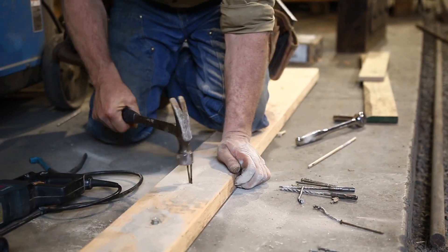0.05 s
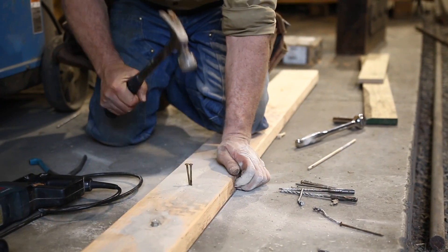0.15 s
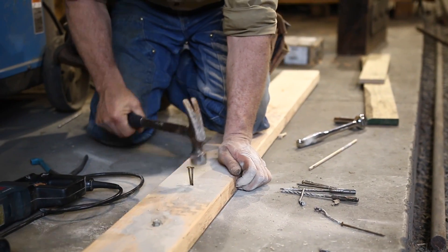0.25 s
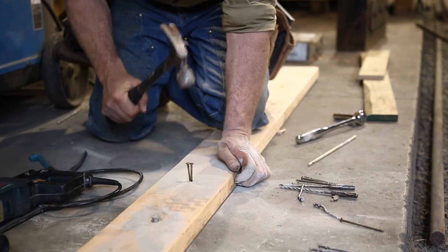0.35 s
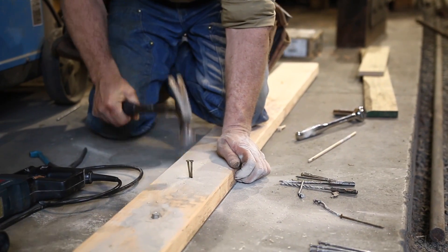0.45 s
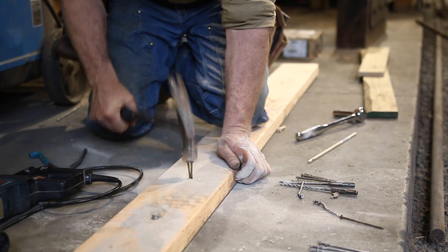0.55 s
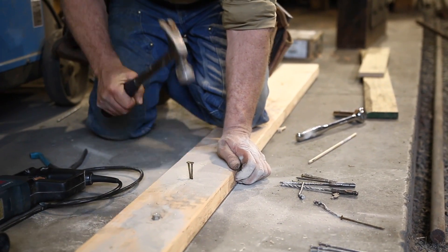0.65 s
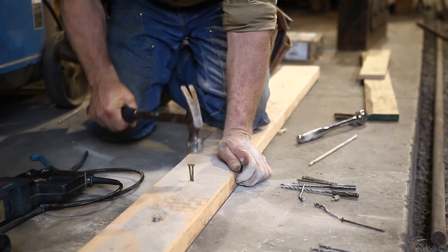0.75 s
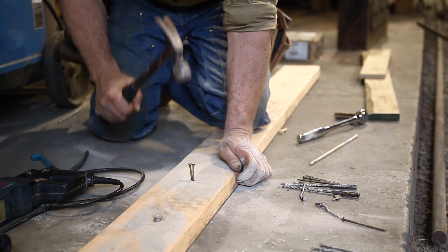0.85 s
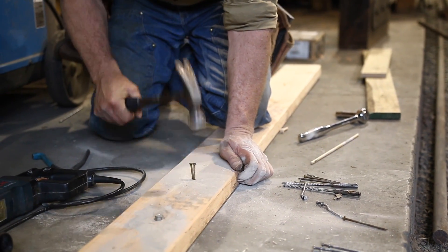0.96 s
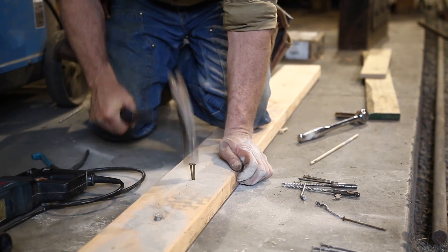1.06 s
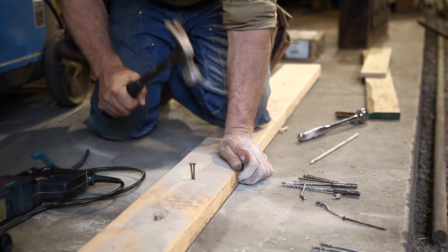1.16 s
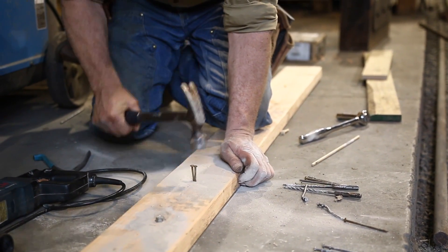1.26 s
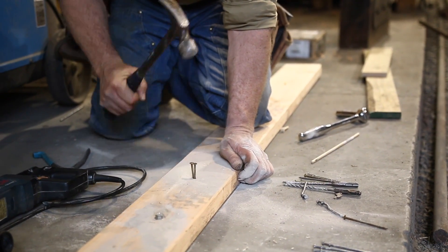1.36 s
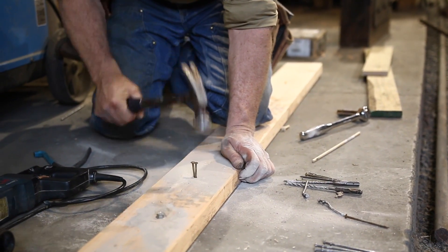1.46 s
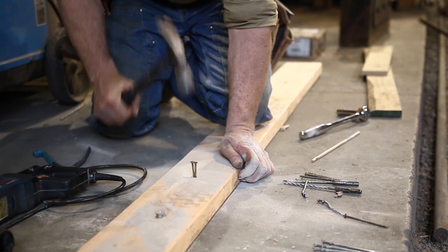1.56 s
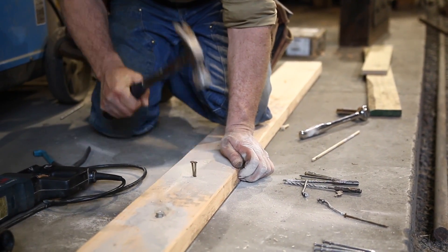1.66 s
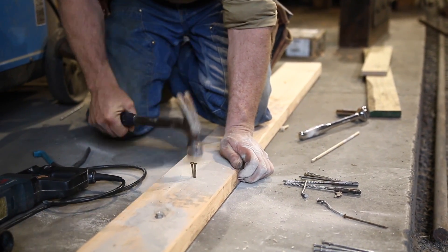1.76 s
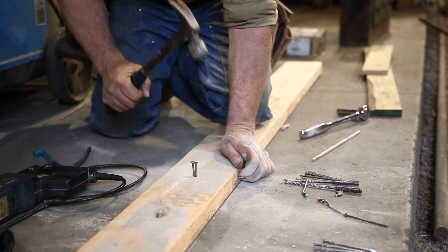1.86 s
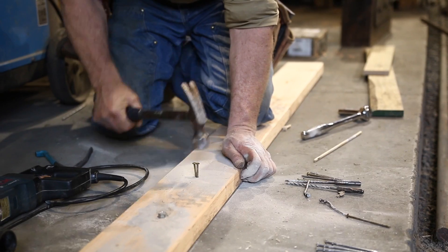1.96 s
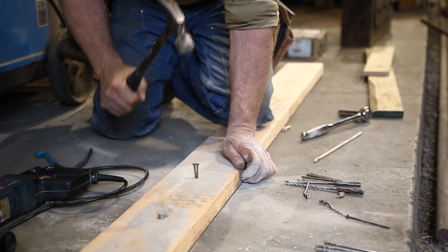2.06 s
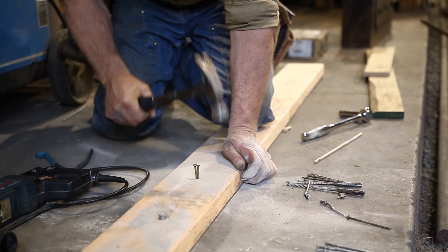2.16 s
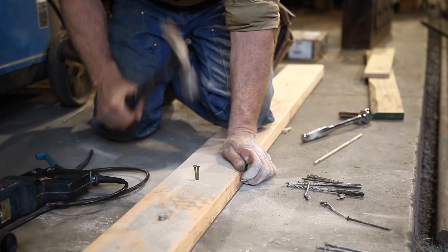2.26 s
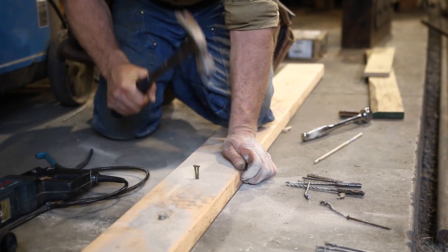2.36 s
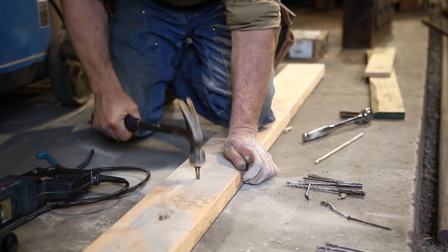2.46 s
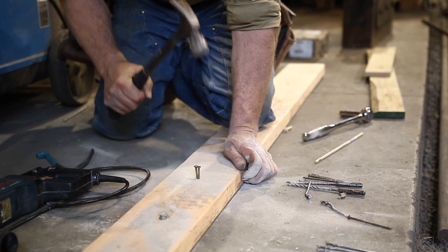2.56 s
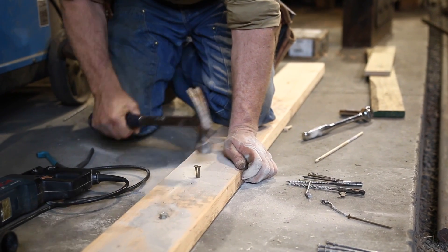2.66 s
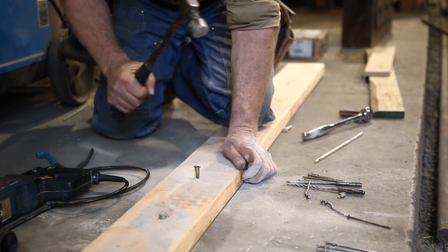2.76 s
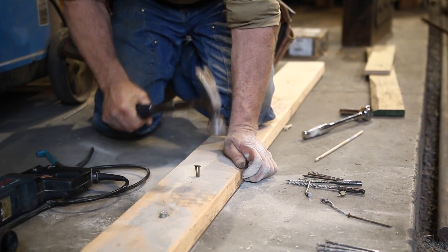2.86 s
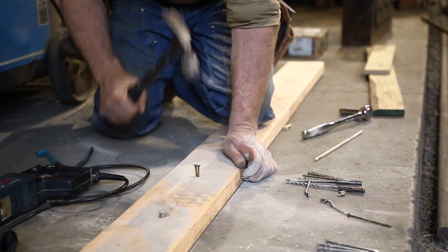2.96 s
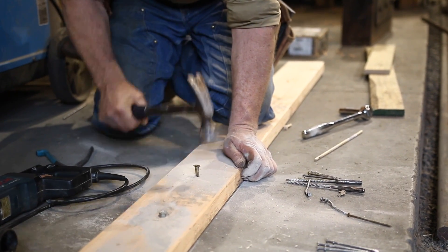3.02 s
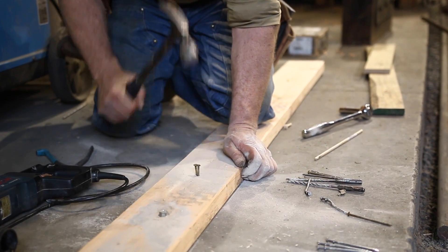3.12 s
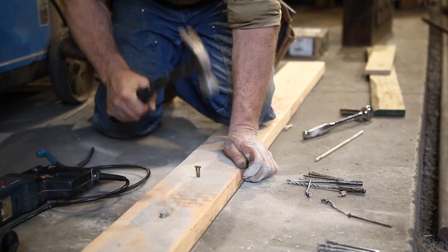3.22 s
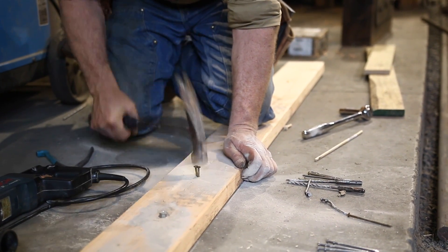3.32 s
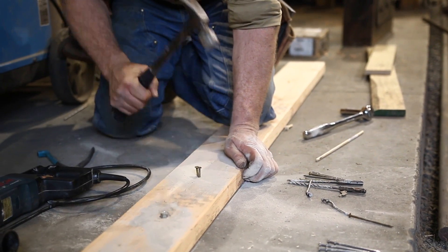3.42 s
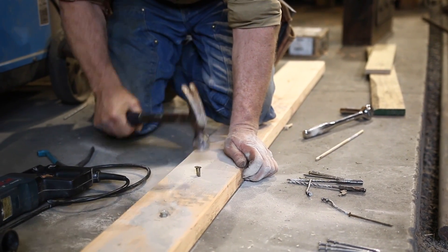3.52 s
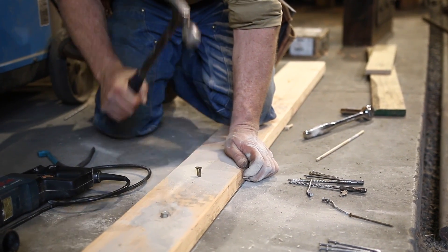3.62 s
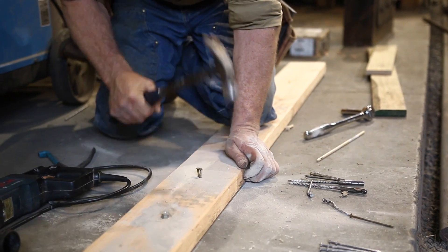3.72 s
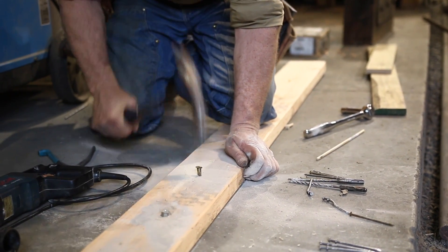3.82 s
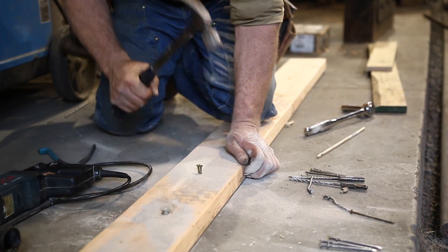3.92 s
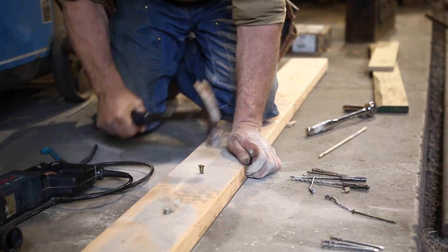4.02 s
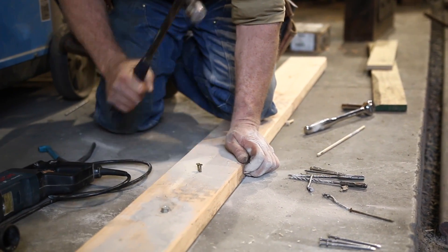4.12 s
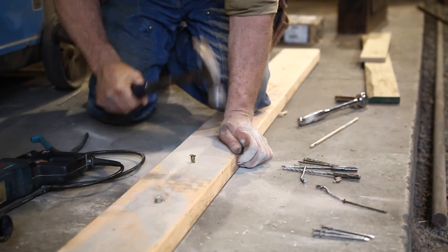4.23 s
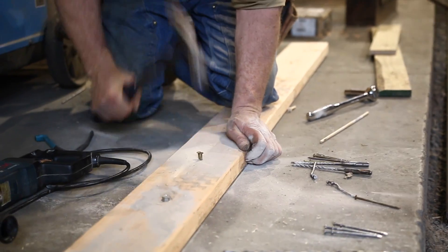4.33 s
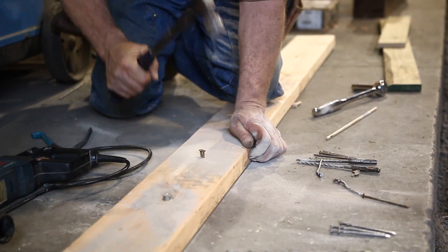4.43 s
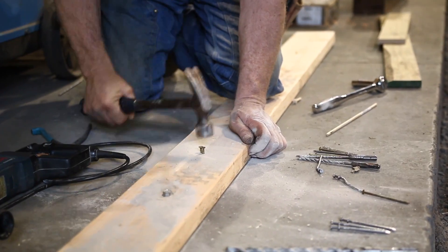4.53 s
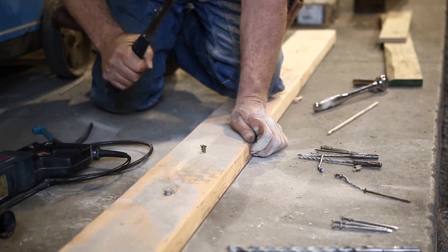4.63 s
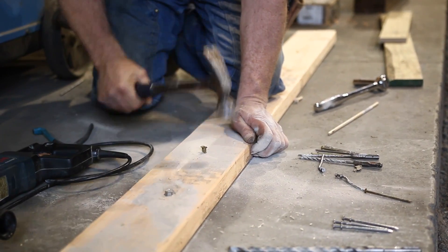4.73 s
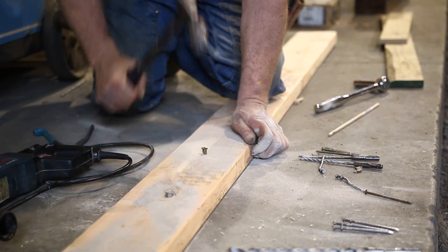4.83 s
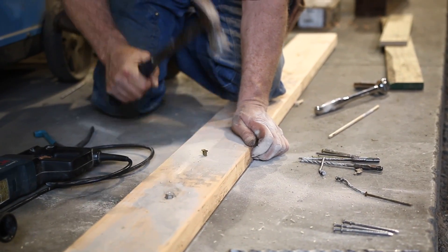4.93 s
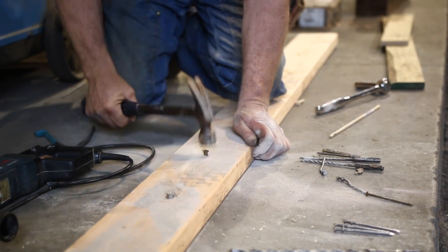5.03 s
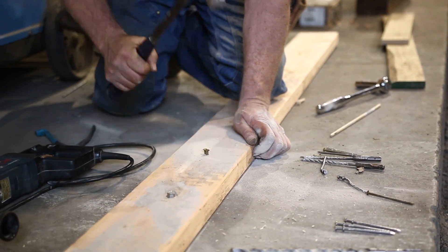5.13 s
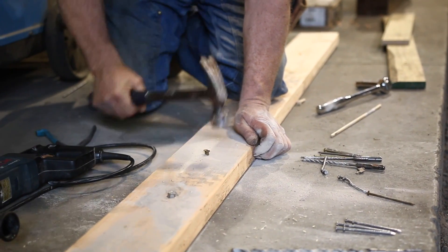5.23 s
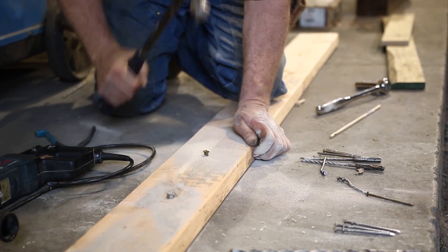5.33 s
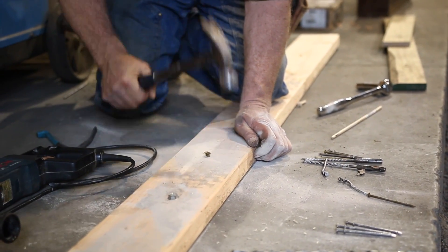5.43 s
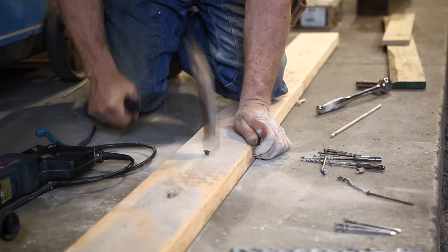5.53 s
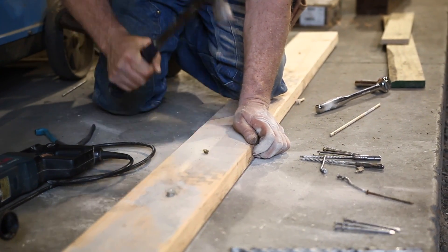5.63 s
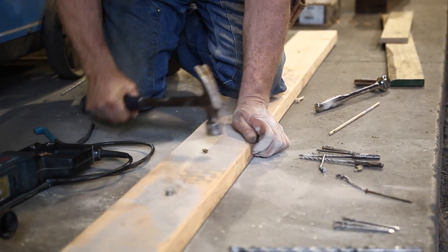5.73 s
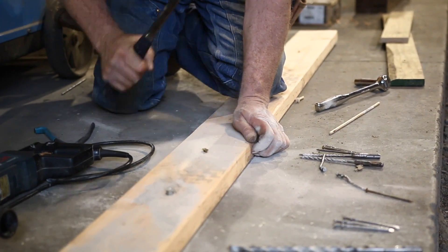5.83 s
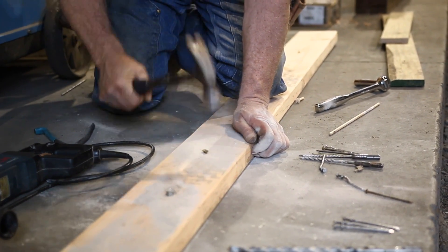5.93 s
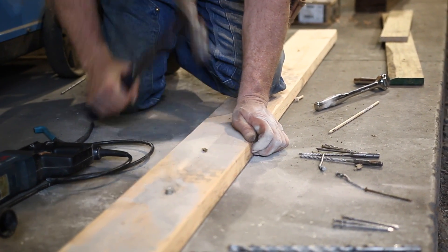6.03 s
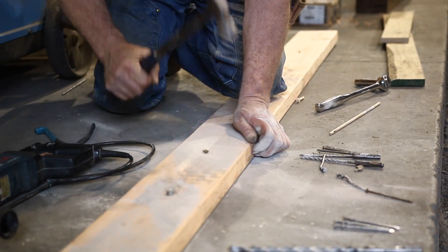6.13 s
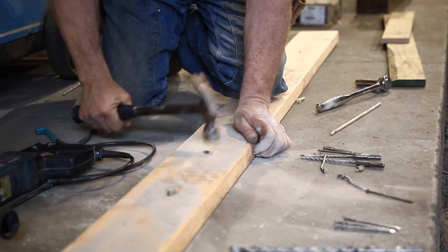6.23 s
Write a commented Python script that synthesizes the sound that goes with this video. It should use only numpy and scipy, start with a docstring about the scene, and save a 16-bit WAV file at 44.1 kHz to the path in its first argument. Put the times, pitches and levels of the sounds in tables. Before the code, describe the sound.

A hammer drives a nail into a plank on concrete with rapid, sharp, even blows, woody knock and steely clank, in a lively workshop.

```python
"""In a quiet workshop, a claw hammer drives a nail into a plank on a concrete floor, about six blows a second.
Each blow excites damped modes of plank and steel and cracks as the nail slips, a noise burst of stick and slip.
The nail's resonances wander and, on the whole, climb as it sinks; a few blows glance off the head.
The claw rings as a decaying sine, and a dense tail of decaying noise answers each blow.
Shaped noise under it all makes a faint rumble and hiss."""
import sys
import numpy as np
from scipy import signal
from scipy.fft import rfft, irfft
from scipy.io import wavfile

SR = 44100
rng = np.random.default_rng(int(sys.argv[2]) if len(sys.argv) > 2 else 0)


def int16_out(signal):
    """Quantize to a 16-bit WAV file."""
    q = np.round(np.clip(np.atleast_2d(signal).T, -1, 1) * 32767)
    wavfile.write(sys.argv[1], SR, q.astype(np.int16))


N = 276948
SIZE = 32768  # samples in the response to one blow
T, HZ = np.arange(SIZE) / SR, np.fft.rfftfreq(SIZE, 1 / SR)  # its time and frequency axes


def gain_of(db):
    """Level to amplitude: 20 dB is a factor of ten."""
    return 10 ** (np.asarray(db) / 20)


def read(points, hz):
    """Logarithmic frequency scale: joins (frequency [Hz], value) points by straight lines on it."""
    f, value = np.transpose(points)
    return np.interp(np.log(hz + 1), np.log(f + 1), value)


def follow(curve, s):
    """Slow variation: the values of a control curve at time s, joined by straight lines."""
    times, *columns = np.transpose(curve)
    return [np.interp(s, times, column) for column in columns]


def add(mix, s, sound):
    """Superposition: adds a sound in at time s, trimmed to the ends of the mix."""
    at = round(s * SR)
    part = mix[max(at, 0):][:len(sound) + min(at, 0)]
    sound = sound[max(-at, 0):]
    part += sound[:len(part)]


def delay(s):
    """Pure delay: a phase that falls linearly with frequency."""
    return np.exp(-2j * np.pi * HZ * s)


def causal(db):
    """Minimum phase: folding the cepstrum forward lets nothing sound before the hit."""
    cepstrum = irfft(np.log(gain_of(db)))
    cepstrum[1:SIZE // 2] *= 2
    cepstrum[SIZE // 2 + 1:] = 0
    return np.exp(rfft(cepstrum))


def hump(hz, octaves):
    """Broad resonance: a Gaussian in octaves, 1 at its centre."""
    distance = np.log2((HZ + 1) / hz)
    return np.exp(-.5 * (distance / octaves) ** 2)


def ringing(modes):
    """Modal superposition: the summed responses of damped resonators."""
    response = 0
    for hz, width, db in modes:
        damping = 1j * HZ * width
        response = response + gain_of(db) * damping / (hz ** 2 - HZ ** 2 + damping)
    return response


# spectrum of the still air: (frequency [Hz], relative level [dB])
AIR = [(20, 2), (60, 3.5), (130, -1), (250, -7), (1000, -7), (4000, -21), (15000, -31)]
AIR_DB = -68  # RMS level of the whole


def air():
    """Stationary noise: a spectral weighting leaves a faint steady rumble and hiss."""
    weighting = gain_of(read(AIR, np.fft.rfftfreq(N, 1 / SR)))
    noise = irfft(rfft(rng.standard_normal(N)) * weighting, N)
    return gain_of(AIR_DB) * noise / noise.std()


# colour of the workshop's answer: (frequency [Hz], relative level [dB])
ROOM = [(40, -17), (130, -3.5), (400, 3.5), (580, 6.5), (1050, 4.5), (1380, -3.5), (2250, 3.5), (2980, -7),
        (3580, 1), (4100, -8.5), (5000, -6.5), (7000, -11.5), (11000, -17.5), (15500, -30.5)]


def room_colour():
    """Room response: the enclosure favours some bands of the tail over others."""
    return causal(read(ROOM, HZ))


# decay of the workshop's answer: (frequency [Hz], time to fall by 60 dB [s])
ROOM_T60 = [(100, 0.24), (400, 0.5), (1000, 0.46), (2200, 0.39), (4500, 0.33), (8000, 0.22), (14000, 0.15)]


def diffuse():
    """Diffuse reverberation: noise of about unit energy in which each band decays exponentially at its own speed."""
    hz, t, bands = signal.stft(rng.standard_normal(SIZE), SR, nperseg=256)
    t60 = np.maximum(read(ROOM_T60, hz), .02)[:, None]
    unit_energy = np.sqrt(2 * np.log(1000) / (t60 * SR))
    fade = gain_of(-60 * t / t60) * unit_energy
    return rfft(signal.istft(bands * fade, SR, nperseg=256)[1][:SIZE])


TAIL_DB, TAIL_GIVE = -1, 0.58  # the tail grows more slowly than the blow, by this many dB for each dB of force
TAIL_DB_PER_S = 0.52  # the deeper the nail sits, the more the plank stirs the room


def tail(s, force_db, walls, change_hz=4000):
    """Partial coherence: long waves reverberate much alike each time, but the moving arm scatters short ones anew."""
    same = np.sqrt(.5) / (1 + (HZ / change_hz) ** 2)
    tail_db = TAIL_DB - TAIL_GIVE * force_db + TAIL_DB_PER_S * s
    return gain_of(tail_db) * (same * walls + np.sqrt(1 - same ** 2) * diffuse())


def scatter(t60=0.012, gap_s=0.0021):
    """Early scattering: dense first echoes off the floor and the worker, of unit energy, after a brief gap."""
    echoes = rng.standard_normal(SIZE) * gain_of(-60 * T / t60) * (1 - np.exp(-(T / gap_s) ** 4))
    return rfft(echoes / np.linalg.norm(echoes))


def nearby_echo(lag_s=0.0095, db=-12, cutoff_hz=4000):
    """Specular reflection: a surface nearby throws the clank back late and duller."""
    return gain_of(db) * delay(lag_s) / (1 + 1j * HZ / cutoff_hz)


def dispersion(centre_hz=950, width_hz=420):
    """Dispersion of bending waves: an all-pass smears the knock over a few milliseconds."""
    pole = centre_hz ** 2 - HZ ** 2 + 1j * HZ * width_hz
    return np.conj(pole) / pole


# modes of the plank on the floor: (frequency [Hz], width [Hz], relative peak level [dB])
PLANK = [(117.7, 20, -1.5), (183.2, 76, 9), (301, 77, 16), (395, 35, 8.5), (483.7, 81, 16.5),
         (563.2, 8.2, 14.5), (620, 29, 14), (728, 23.4, 13.5), (833, 35, 9.5), (903, 30, 12.5),
         (992, 29, 13), (1092, 29, 13.5), (1403, 53, 9.5), (1496, 24, 12)]


def plank_response(push_hz=2400, radiate_hz=98):
    """Forced vibration and radiation: a soft push drives the modes of a plank too narrow to shed deep bass."""
    radiation = causal(-10 * np.log10(1 + (radiate_hz / (HZ + 5)) ** 6))
    push = 1 / (1 + 1j * HZ / push_hz) ** 2  # the wood yields
    return ringing(PLANK) * dispersion() * radiation * push


# share of each blow the nail passes into the plank: (time [s], thud level [dB], hollow knock level [dB])
WOOD = [(0.3, -10.5, -2.5), (0.47, 0, 2.5), (0.64, 2, -4.5), (1.2, 4, 4), (1.5, 1.5, 0.5),
        (2.18, 3.5, -0.5), (2.38, 0, -8.5), (3.0, 2, -3.5), (4.75, 1, -1), (5.27, 1.5, 1), (5.55, 2.5, 3)]
BOOM_DB, BOOM_DB_PER_S = 3, -0.78  # the plank's deepest boom thins out as the nail sinks
THUD_GIVE = 0.29  # the wood gives: the thud's share falls by this many dB for each dB of force


def wood_db(s, force_db):
    """Force transmission: the depth of the nail sets how much boom, thud and knock reach the plank."""
    thud_db, knock_db = follow(WOOD, s)
    boom = (BOOM_DB + BOOM_DB_PER_S * s) * hump(102, 0.52)
    thud = (thud_db - THUD_GIVE * force_db) * hump(385, 1.0)
    return boom + thud + knock_db * hump(1084, 0.32)


SEATING_S = 5.18, 5.44  # from the first time to the second, the head closes in on the wood


def seated(s):
    """Boundary condition: 0 while the head stands clear of the wood, 1 once it is nearly home."""
    return np.interp(s, SEATING_S, (0, 1))


# bending resonance of the nail, shifting with the grip of the wood and climbing as its free length
# runs out: (time [s], frequency [Hz], level [dB])
BENDING = [(0.12, 2180, 2), (0.3, 810, 10), (0.47, 1850, 6), (0.64, 1590, 5.5), (1.14, 2510, 4.5),
           (1.83, 2230, 4.5), (2.15, 1870, 3.5), (2.38, 1400, 9.5), (2.9, 1740, 7.5), (3.74, 1680, 4),
           (4.59, 2010, 2), (4.76, 3430, 3.5), (5.1, 3600, 6.5), (5.44, 4640, 7.5), (6.13, 5100, 4.5)]
# squeak of the shank, rising on the whole as the nail sinks: (time [s], frequency [Hz], level [dB])
SQUEAK = [(0.12, 7300, 3.5), (0.3, 4380, 6.5), (0.47, 4500, -1), (0.64, 4900, 7.5), (1.3, 4650, 8),
          (2.0, 4900, 4), (2.2, 4900, 10.5), (2.7, 5100, 9), (2.89, 6400, 1.5), (3.3, 6000, 5.5),
          (3.92, 7170, 6.5), (4.6, 7940, 2), (4.93, 10000, 14), (5.27, 8660, 8.5), (5.6, 10300, 7)]
SEATED_HZ, SEATED_DB = 2670, 9.5  # clank of the stiff stub once seated


def nail_db(s):
    """Resonance of a shortening rod: bending and squeak shift with depth, then the stiff stub clanks."""
    bend_hz, bend_db = follow(BENDING, s)
    squeak_hz, squeak_db = follow(SQUEAK, s)
    bending = bend_db * hump(bend_hz, 0.17)
    squeak = squeak_db * hump(squeak_hz, 0.2)
    return bending + squeak + seated(s) * SEATED_DB * hump(SEATED_HZ, 0.12)


def blow_colour(s, force_db, tick_db):
    """Excitation spectrum: force, wood and nail add in dB with the tick of the landing face."""
    tick = tick_db * hump(10400, 0.53)
    return causal(force_db + wood_db(s, force_db) + nail_db(s) + tick)


def slip(contact, swell=0.93, hold=5.0, count=8):
    """Stick and slip: a noise burst that swells and dies, its energy spread almost evenly over frequency."""
    u = T / max(contact, 1 / SR)
    envelope = (1 - np.exp(-swell * u)) * np.exp(-(u / hold) ** 2)
    rasp = rng.standard_normal(SIZE) * u * np.exp(-u)
    for _ in range(count):  # flatten the spectrum and reshape in time by turns
        flat = np.exp(1j * np.angle(rfft(rasp)))
        rasp = irfft(flat) * envelope
    return rfft(rasp / np.linalg.norm(rasp))


# modes of the hammer and nail in contact: (frequency [Hz], width [Hz], relative peak level [dB])
STEEL = [(1710, 9.9, -9), (2046, 16, 14), (2020, 30, -6.5), (2268, 115, 7), (2350, 86, 7), (2628, 318, 7.5),
         (3230, 260, 5), (3412, 81, 9.5), (3600, 9.9, -10), (4720, 118, 4.5), (6310, 47, 2.5),
         (7770, 92, -19), (10510, 150, -5.5)]
# crack of the slipping nail: (frequency [Hz], relative level [dB])
CRACK = [(60, -32), (900, -17.5), (2000, -11.5), (3300, -6.5), (4200, -5.5), (5500, -3.5), (7000, -9.5),
         (8500, -10.5), (10500, -8), (13000, -16), (14700, -12), (15800, -9)]


def steel_response():
    """Modes in contact: the ringing of hammer and nail beside the broadband crack of the slipping nail."""
    return ringing(STEEL) + causal(read(CRACK, HZ))


CLAW_HZ, CLAW_T60, CLAW_DB = 6381, .25, -46  # pitch [Hz], time to fall by 60 dB [s], base level [dB]


def claw_ring():
    """Free vibration: one mode of the claw, a sine that decays exponentially."""
    return gain_of(CLAW_DB - 60 * T / CLAW_T60) * np.sin(2 * np.pi * CLAW_HZ * T)


# square blows: (time [s], force [dB], tick of the face [dB], claw ring [dB])
BLOWS = [(-0.06, -8, -11, -20), (0.298, -2.5, 0, -12), (0.471, -12, 2, -18), (0.6353, -0.5, -4, -5),
         (0.8011, -5, -4.5, -9), (1.138, 0, -3.5, -14), (1.3056, 1.5, 1, -1), (1.4816, -0.5, 0, -2),
         (1.6567, 1, -5, -3), (1.8302, 0, -3.5, -4), (2.003, -4, 3, -14), (2.1778, -2, 5, -7),
         (2.3557, -0.5, -0.5, -7), (2.5344, -3, -1, -13), (2.7149, 0.5, -0.5, 0), (3.0645, -0.5, 0, 2),
         (3.2327, 3, 0.5, -7), (3.407, -1.5, 0, 4), (3.5751, -1, -1.5, -10), (3.7392, 4.5, -6.5, -4),
         (3.9142, -1.5, -1, 5), (4.082, -0.5, 4, -4), (4.249, 2, 2, 3), (4.419, 5, 1.5, -2),
         (4.5897, 4, -1, -11), (4.7598, 2.5, -2.5, -2), (4.9306, 0, -12, -18), (5.1007, 1, -2.5, -8),
         (5.272, -0.5, -0.5, -12), (5.4406, 2, -1, -8), (5.6087, 1.5, 1, -16), (5.7805, -1.5, 2, -10),
         (5.9537, -1, -1, -4), (6.1261, -0.5, -3.5, -16)]
CONTACT_S = .0016  # time scale of the contact in a square blow
# glancing blows, most of which scrape over the head for longer:
# (time [s], force [dB], tick of the face [dB], claw ring [dB], time scale of the contact [s])
GLANCES = [(0.11, -20, 3, -18, 0.0066), (0.1223, -22.5, -4, -25, 0.0018), (0.9607, -7, -1, 0, 0.0022),
           (2.887, -12.5, -3, -1, 0.0043), (2.9084, -16.5, 3.5, -15, 0.0013)]


def hammer(push_lag=0.31, scatter_db=-8):
    """Impact excitation: every blow pushes the plank, rasps the steel, rings the claw and stirs the room."""
    plank, steel, claw = plank_response(), steel_response(), claw_ring()
    echo, room, walls = nearby_echo(), room_colour(), diffuse()
    square = [(*blow, CONTACT_S) for blow in BLOWS]
    out = np.zeros(N)
    for s, force_db, tick_db, claw_db, contact in square + GLANCES:
        rasp = slip(contact)
        thump = plank * delay(push_lag * contact)
        clank = steel * rasp * (1 + echo + gain_of(scatter_db) * scatter())
        answer = room * rasp * tail(s, force_db, walls)
        strike = irfft(blow_colour(s, force_db, tick_db) * (thump + clank + answer))
        add(out, s, strike + gain_of(claw_db) * claw)
    return out


def scene():
    """Superposition: the hammering over the still air of the workshop, in one channel."""
    return (hammer() + air())[None]


EDGE_HZ = 15400  # upper band limit


def record(dry, ceiling_db=-7):
    """Saturation and band limiting: the loudest peaks are rounded off, then a low-pass follows."""
    ceiling = gain_of(ceiling_db)
    rounded = ceiling * np.tanh(dry / ceiling)
    low_pass = signal.firwin(151, EDGE_HZ, window=("kaiser", 9), fs=SR)
    return signal.oaconvolve(rounded, low_pass[None], "same")


dry = scene()
out = record(dry)
int16_out(out)
```